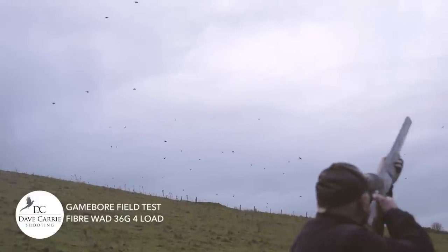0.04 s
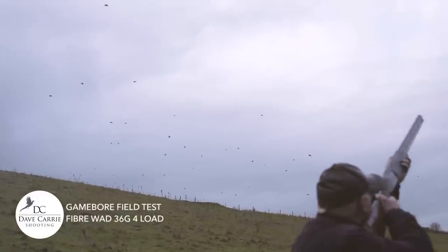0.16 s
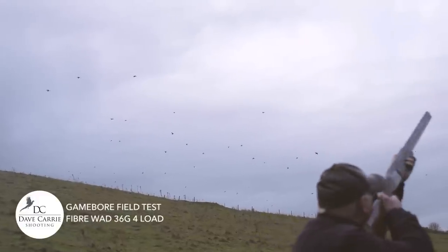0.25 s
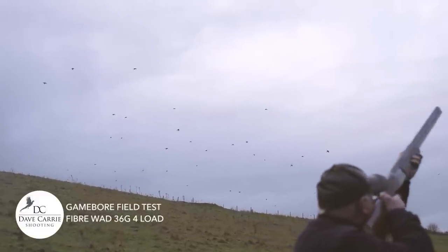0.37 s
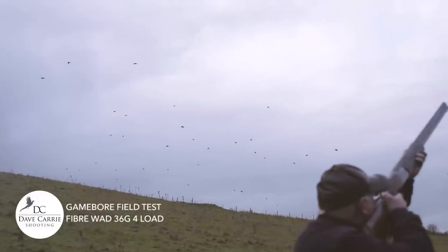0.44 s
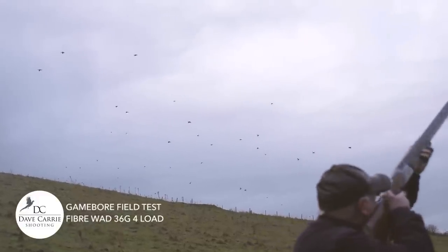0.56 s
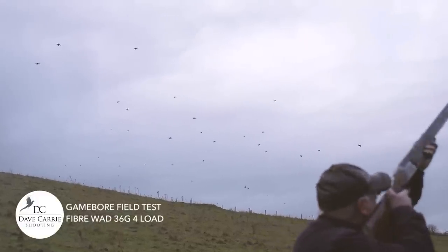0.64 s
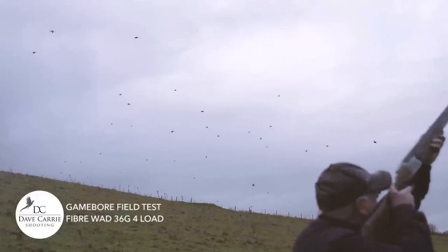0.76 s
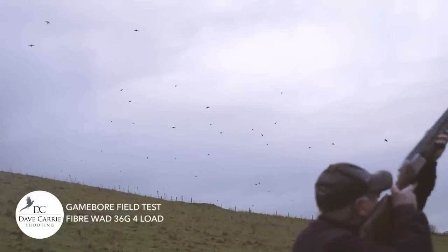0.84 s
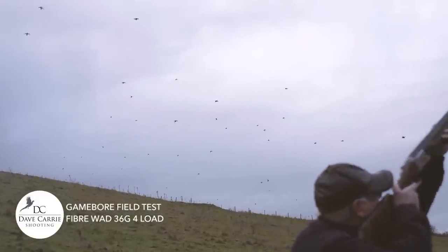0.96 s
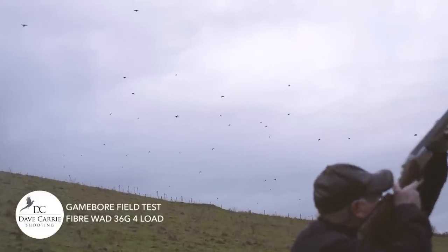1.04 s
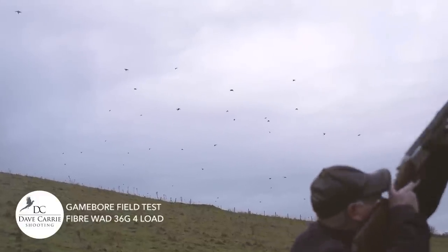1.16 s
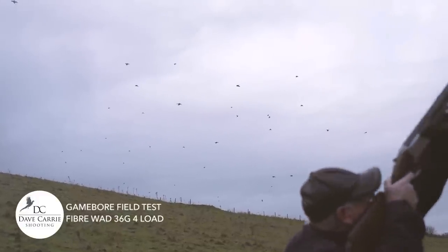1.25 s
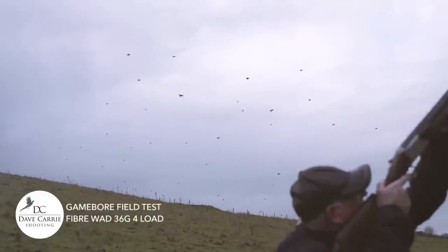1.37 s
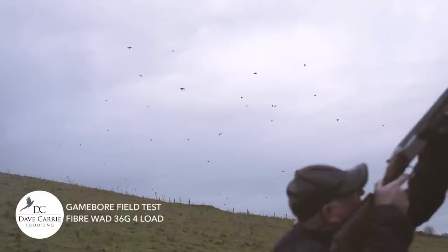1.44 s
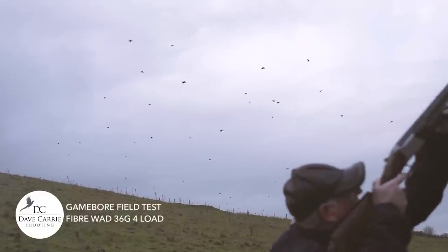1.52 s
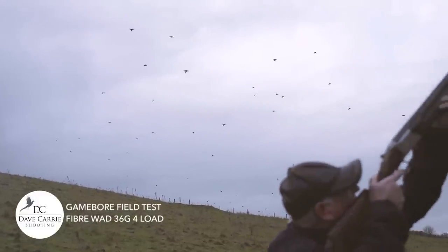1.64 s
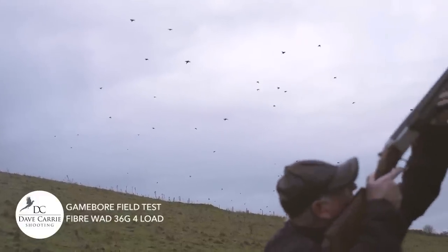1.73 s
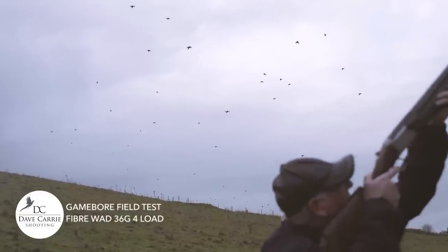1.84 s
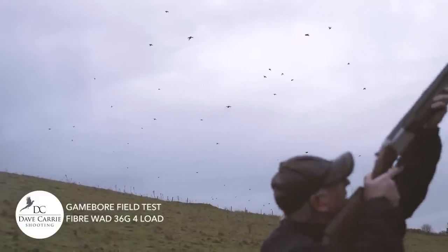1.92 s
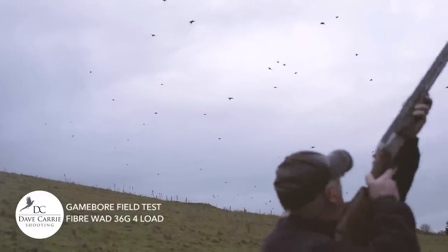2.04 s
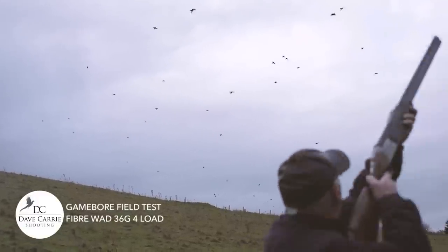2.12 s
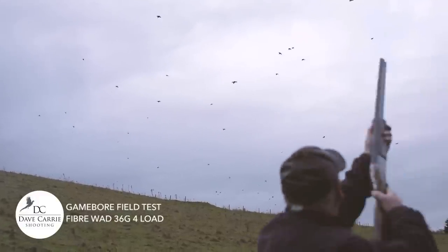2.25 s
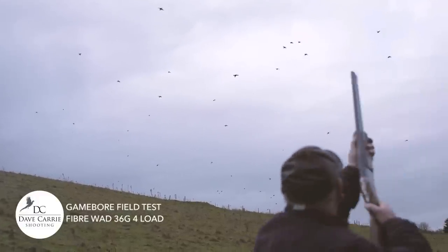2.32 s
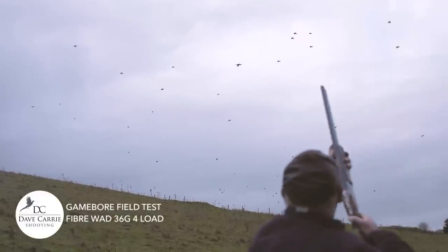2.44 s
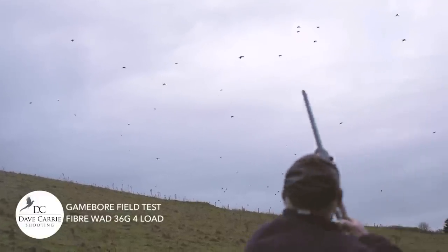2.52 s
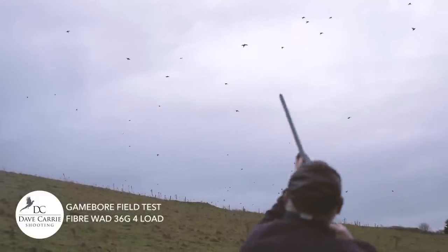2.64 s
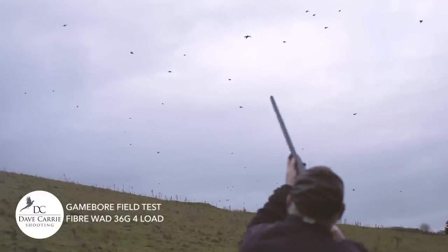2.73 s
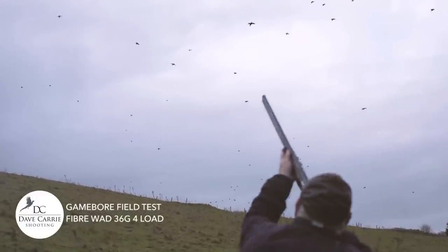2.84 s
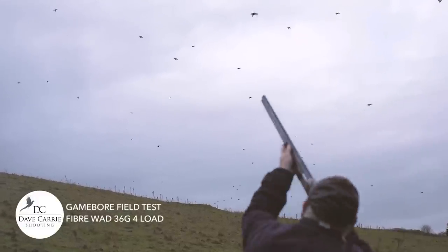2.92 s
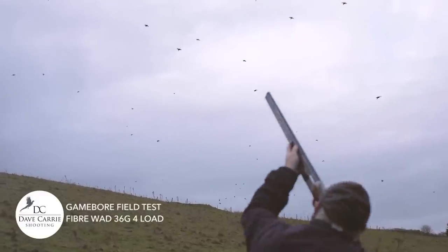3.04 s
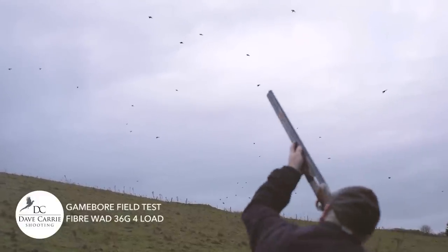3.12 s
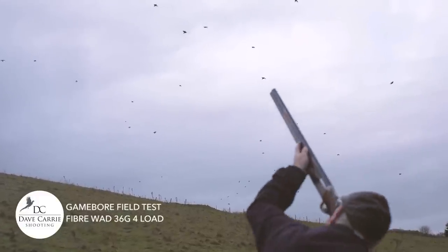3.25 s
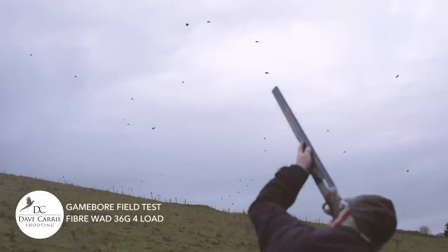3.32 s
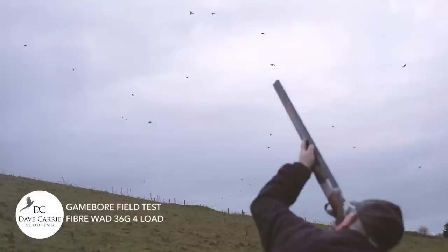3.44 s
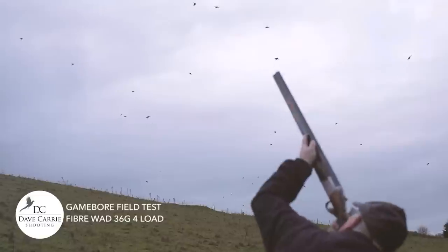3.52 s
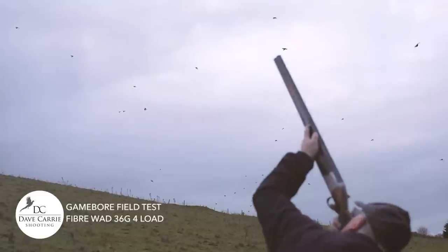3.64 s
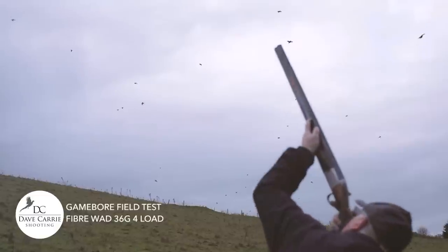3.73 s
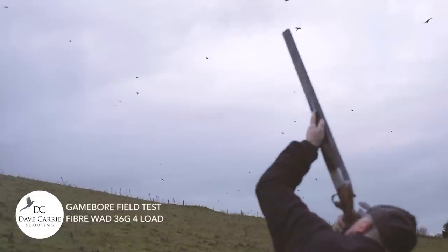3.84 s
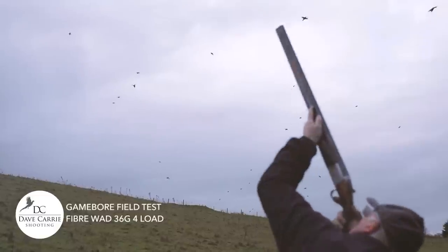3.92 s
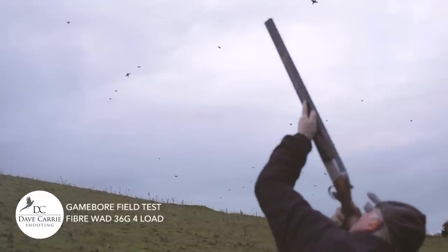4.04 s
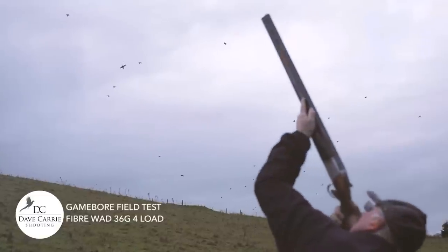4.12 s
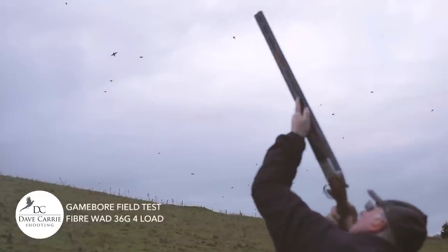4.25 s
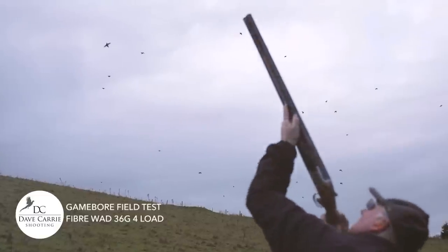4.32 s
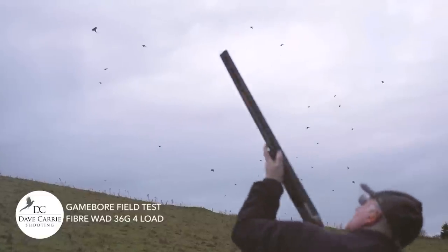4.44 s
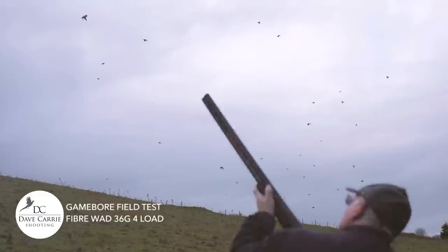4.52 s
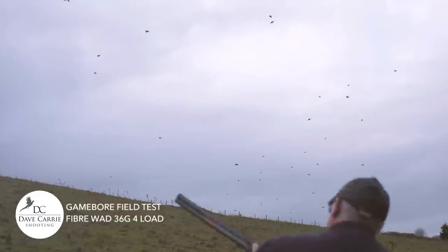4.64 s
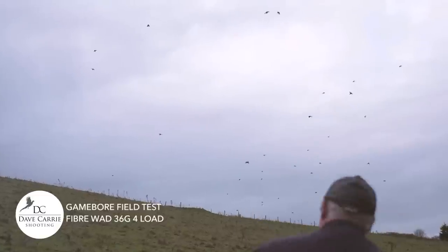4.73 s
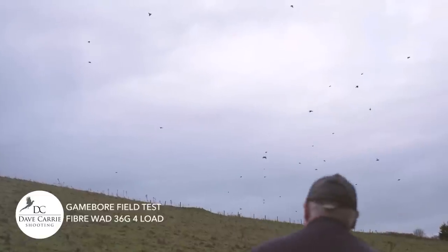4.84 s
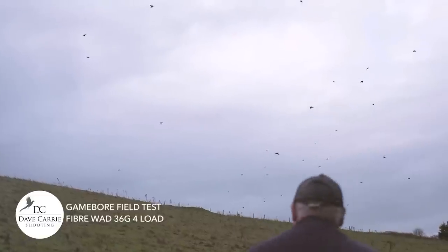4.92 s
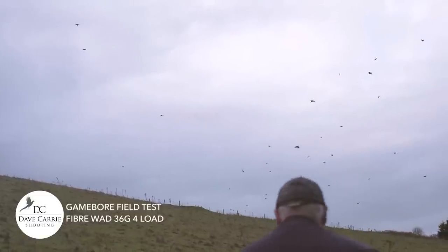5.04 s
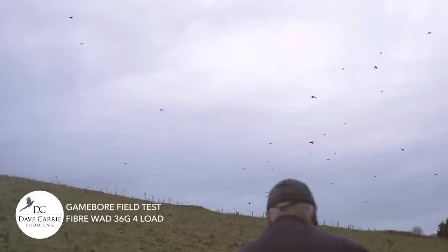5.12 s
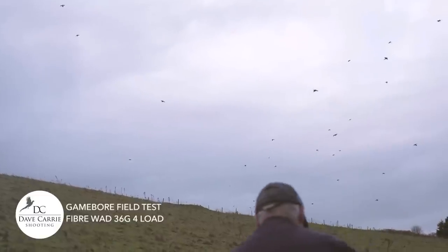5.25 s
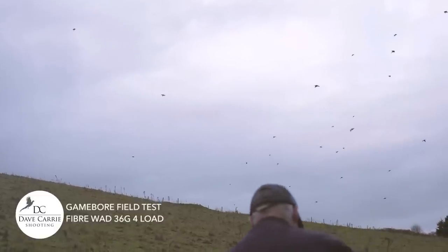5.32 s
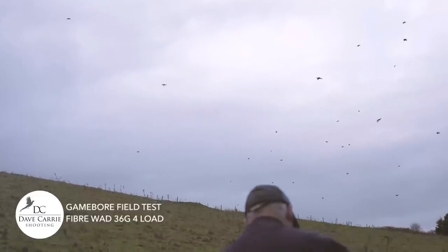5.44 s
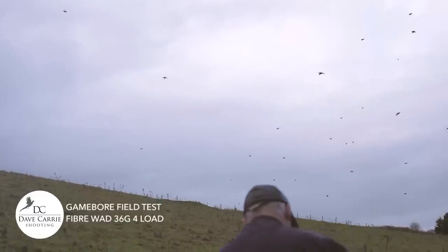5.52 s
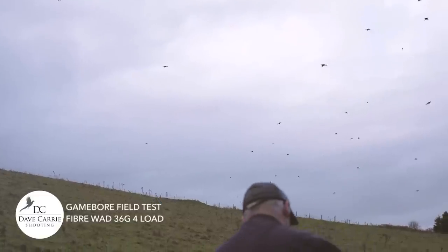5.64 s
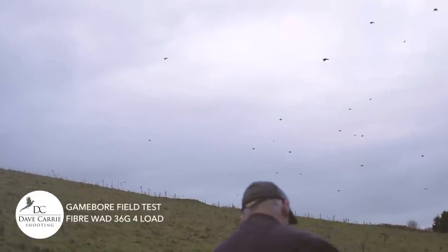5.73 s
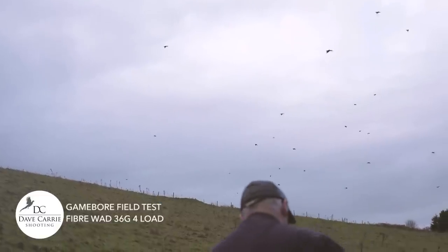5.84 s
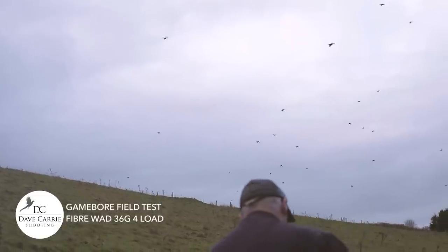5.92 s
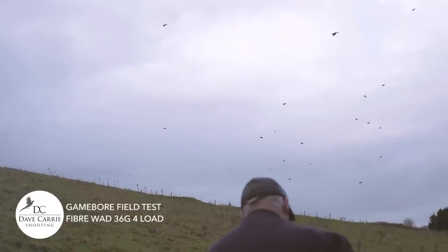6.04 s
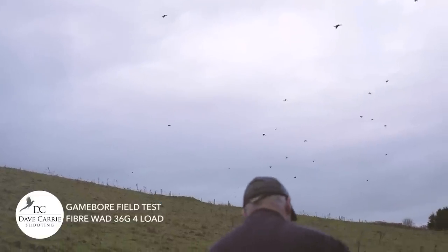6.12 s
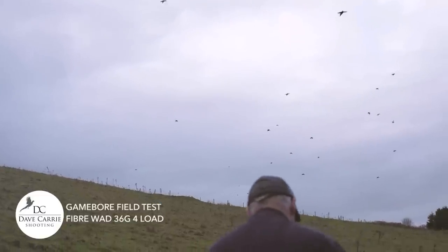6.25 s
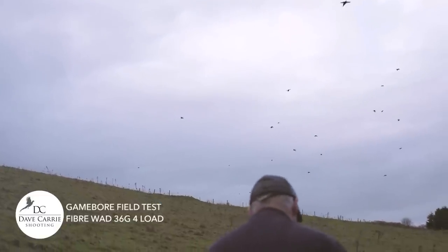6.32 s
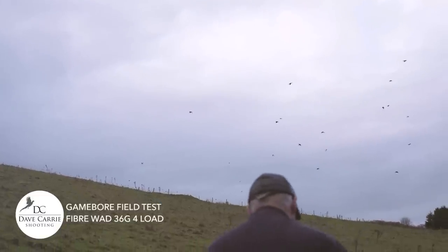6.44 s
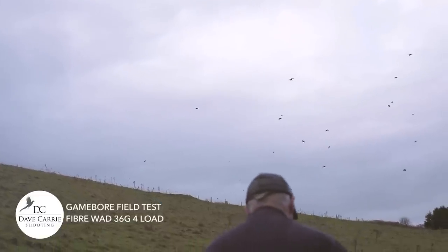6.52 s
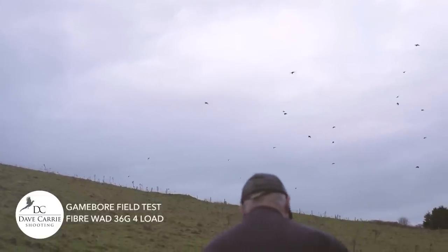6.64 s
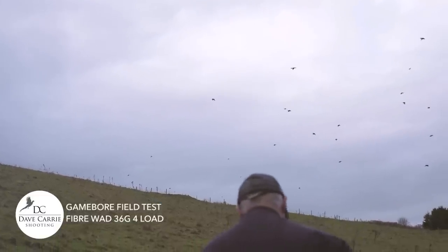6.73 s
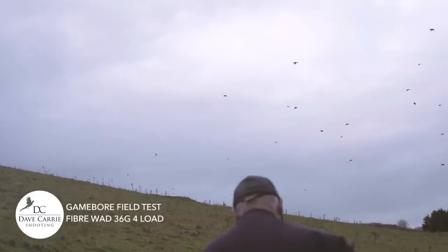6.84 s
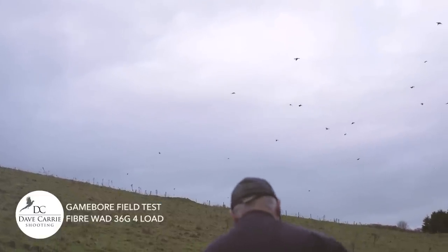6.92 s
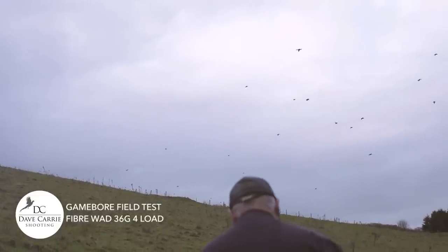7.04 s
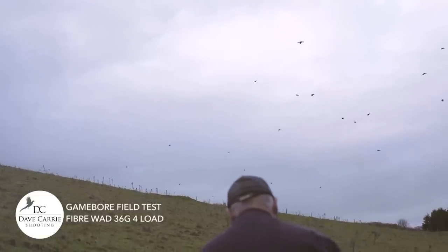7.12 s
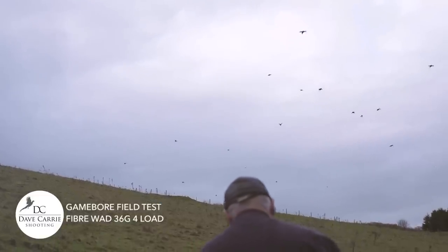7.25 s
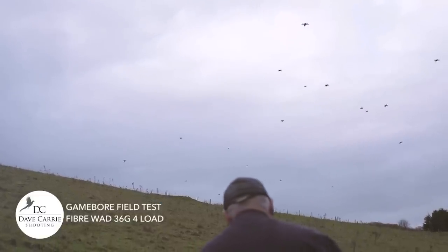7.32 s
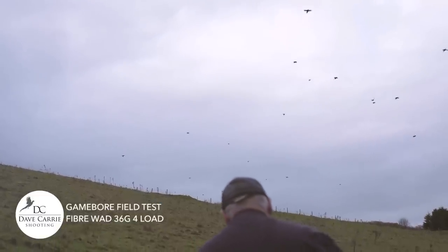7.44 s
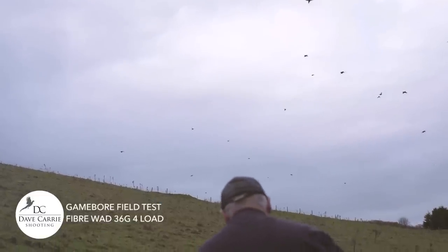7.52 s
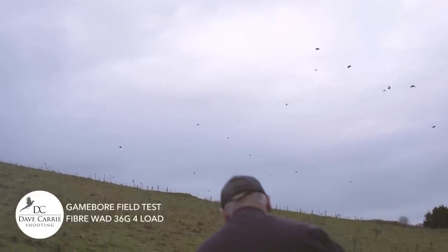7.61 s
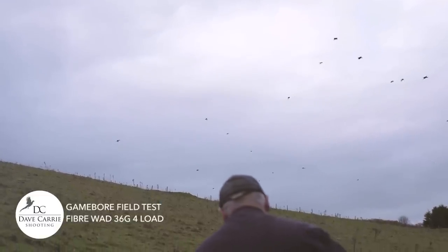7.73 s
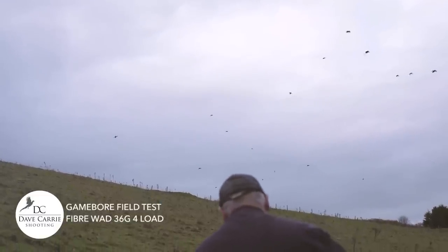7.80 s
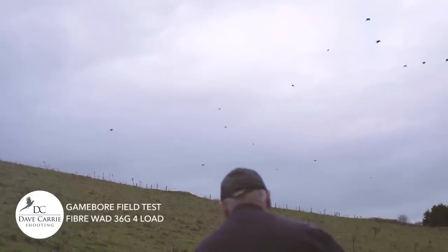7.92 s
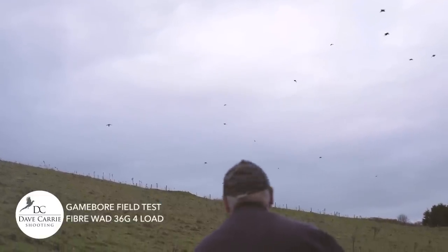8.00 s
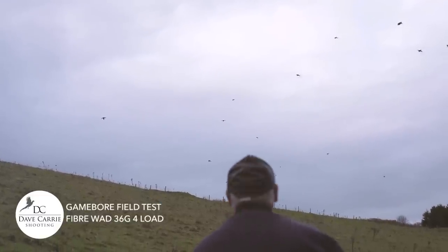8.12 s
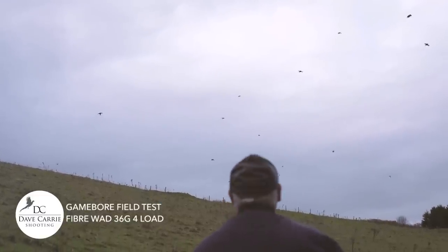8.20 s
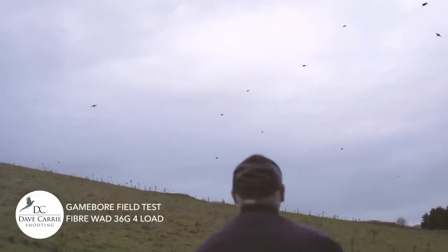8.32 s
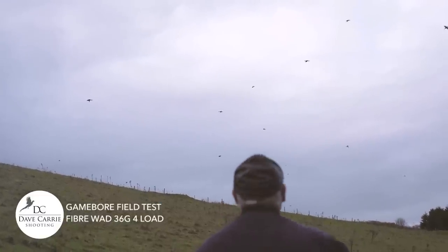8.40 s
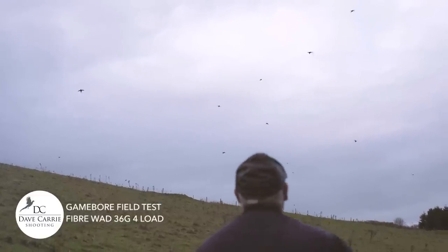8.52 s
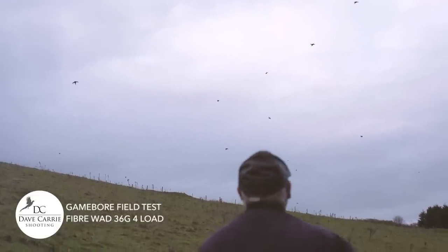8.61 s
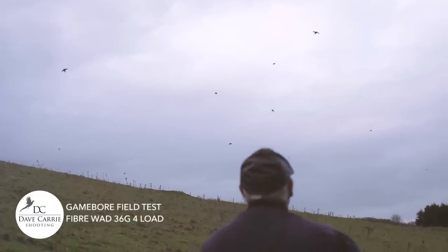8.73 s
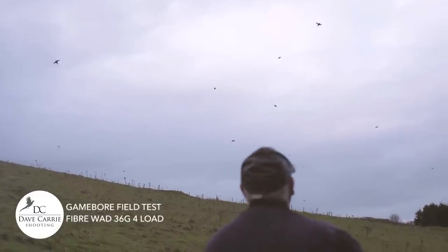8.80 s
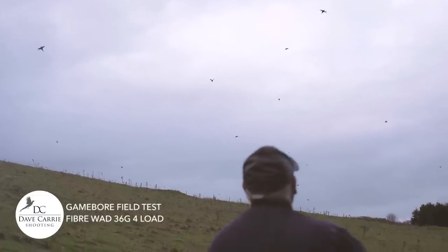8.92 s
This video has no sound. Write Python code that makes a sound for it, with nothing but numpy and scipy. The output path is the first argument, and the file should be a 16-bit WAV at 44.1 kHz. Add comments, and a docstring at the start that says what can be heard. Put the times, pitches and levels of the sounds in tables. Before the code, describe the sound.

Several shooters fire in open country, heard from just behind one of them. Two tight groups of blasts, each including a very close, sharp, overloaded shot, give way to isolated side and distant booms. Echoes roll down the valley. The gun is handled with small steel clacks, clothing rustles faintly, a tiny bird chirps briefly, and wind rumbles and thuds against the microphone, growing late.

```python
"""Shotguns fire at high birds from four stands along a grassy valley: blast impulses with ground bounces,
two slaps off the slope and a diffuse roll over the land; the closest blasts overload the input.
Softer rolls come from far down the valley. Struck steel clicks as the gun is handled, and many ticks
merge into a rustle. Gliding tones make a small bird, coloured noise a faint hush of open country,
and wind rumbles and buffets on the microphone."""
import sys
import numpy as np
from scipy import signal
from scipy.fft import rfft, irfft, next_fast_len
from scipy.io import wavfile
from scipy.ndimage import uniform_filter1d

SR = 44100
rng = np.random.default_rng(int(sys.argv[2]) if len(sys.argv) > 2 else 0)


def to_wav(sig):
    """Store sig (one row per channel, or 1-D mono) as 16-bit WAV at the path in sys.argv[1].

    Samples outside -1..1 are clipped; the rate is SR.
    """
    pcm = np.clip(np.atleast_2d(sig), -1, 1) * 32767
    pcm = np.round(pcm).astype(np.int16)
    wavfile.write(sys.argv[1], SR, pcm.T)  # frames by channels


N = 395577  # length of the scene [samples]
SHORT_FRAMES = dict(nperseg=256, noverlap=192)  # [samples]
LONG_FRAMES = dict(nperseg=1024, noverlap=768)  # [samples]


def amp(db):
    """Decibel law: level to amplitude ratio."""
    return 10 ** (np.asarray(db) / 20)


def evened(x):
    """Power normalisation: scale to rms 1."""
    return x / np.sqrt(np.mean(x ** 2) + 1e-20)


def unit(x):
    """Energy normalisation: scale to energy 1."""
    return x / (np.linalg.norm(x) + 1e-12)


def read(table, hz, axis=1):
    """Spectral interpolation: one column of a table along a log-frequency axis."""
    columns = np.transpose(table)
    return np.interp(np.log(hz + 1), np.log(columns[0] + 1), columns[axis])


def bins(size):
    """Fourier analysis: the frequencies of a real spectrum [Hz]."""
    return np.fft.rfftfreq(size, 1 / SR)


def octaves(hz):
    """Logarithmic pitch: octaves above 1 kHz, held constant below 200 Hz."""
    return np.log2(np.maximum(hz, 200) / 1000)


def add(mix, s, sound):
    """Superposition: add a sound to the mix, starting at s seconds."""
    part = mix[round(s * SR):][:len(sound)]
    part += sound[:len(part)]


def noise(table):
    """Spectral shaping: steady random noise of a given colour, rms 1."""
    size = next_fast_len(N)
    spectrum = rfft(rng.standard_normal(size)) * amp(read(table, bins(size)))
    return evened(irfft(spectrum, size)[:N])


def patchwork(shape, bands, frames):
    """Random modulation: patches smoothed over neighbouring bands and frames, rms 1."""
    across_bands = uniform_filter1d(rng.standard_normal(shape), size=bands, axis=0)
    return evened(uniform_filter1d(across_bands, size=frames, axis=1))


def burst(colour_db, decay, lead):
    """Impulse and scattering: a pressure step and its scatter off nearby surfaces, energy 1."""
    size = 2 * (len(colour_db) - 1)
    t = np.arange(size) / SR
    scatter = unit(rng.standard_normal(size) * np.exp(-(t / decay) ** 2))
    scatter[0] += lead
    z = rfft(scatter)
    # the scatter smears the impulse in time but leaves its broad colour alone
    ripple = np.sqrt(uniform_filter1d(abs(z) ** 2, size=21))
    log_gain = np.log(amp(colour_db) / ripple)
    # minimum phase: the colour is applied without sound ahead of the step
    mirrored = np.r_[log_gain, log_gain[-2:0:-1]]
    causal = np.exp(np.conj(signal.hilbert(mirrored)))
    return unit(irfft(z * causal[:len(z)])[:size // 2])


# colour of the open country: (frequency [Hz], relative level [dB])
HUSH = [(150, -20), (300, -7), (550, -3.5), (800, -13.5), (1000, -12), (1350, -10.5), (1900, -26),
        (3200, -20), (4000, -27.5), (5500, -42), (9000, -45), (15000, -53)]
HUSH_DB, HUSH_DRIFT_DB = -66.5, 2  # steady level; rms drift [dB]


def country(patchy_db=4.5):
    """Diffuse ambience: coloured noise whose faint hush drifts in patches."""
    z = signal.stft(noise(HUSH), SR, **LONG_FRAMES)[2]
    patches = patchwork(z.shape, bands=6, frames=14)
    drift = evened(uniform_filter1d(rng.standard_normal(z.shape[1]), size=40))
    z = z * amp(patchy_db * patches + HUSH_DRIFT_DB * drift)
    hush = signal.istft(z, SR, **LONG_FRAMES)[1][:N]
    return amp(HUSH_DB) * evened(hush)


GUST_ATTACK_S, GUST_RELEASE_S, GUST_SWELL_DB = 0.0096, 0.013, 5


def gust(start, length, db):
    """Transient envelope: a gust arrives quickly, swells to its middle and lets go."""
    t = np.arange(N) / SR - start
    swell_db = GUST_SWELL_DB * (np.sin(np.pi * np.clip(t / length, 0, 1)) - 1)
    attack = np.minimum(t, 0) / GUST_ATTACK_S
    release = np.maximum(t - length, 0) / GUST_RELEASE_S
    return amp(db + swell_db) * np.exp(attack - release)


# steady wind, easing in the middle and freshening towards the end: (time [s], relative level [dB])
BREEZE = [(0, -55.5), (.7, -55.5), (1.2, -53.5), (1.75, -60), (2.22, -50), (2.7, -53), (3.3, -51),
          (4.1, -57.5), (4.45, -64), (4.77, -55), (5.3, -61.5), (6.1, -52.5), (6.85, -44.5), (7.2, -49),
          (7.55, -39.5), (8.05, -44.5), (8.97, -39)]
# colour of the steady wind: (frequency [Hz], relative level [dB])
RUMBLE = [(15, 4.5), (35, 6), (70, 0.5), (120, -1.5), (180, -9.5), (280, -21), (500, -40), (1500, -69),
          (4000, -97.5)]
# gusts that strike the microphone: (start [s], length [s], relative peak level [dB])
GUSTS = [(1.992, 0.23, -36), (2.25, .21, -37), (2.577, .025, -44.5), (2.715, 0.081, -30),
         (2.809, 0.058, -40), (2.942, 0.043, -44), (3.085, 0.036, -34), (7.423, 0.26, -25),
         (7.719, 0.022, -36), (7.854, 0.072, -39), (8.447, .06, -35.5), (8.602, 0.043, -35),
         (8.662, 0.12, -26.5), (8.811, 0.056, -26)]
# colour of a gust at unit speed: (frequency [Hz], relative level [dB])
BUFFET = [(20, -14.5), (70, 3.5), (120, 6), (220, 2), (350, -5.5), (550, -12.5), (750, -29), (1100, -37.5),
          (1700, -61), (4000, -98.5)]


def wind(rumble_db=3, buffet_db=-0.5, reference_db=-33, opening=2.42):
    """Turbulence: a steady rumble, and gusts whose eddies get smaller and brighter as they grow."""
    t = np.arange(N) / SR
    rumble = amp(rumble_db + np.interp(t, *np.transpose(BREEZE))) * noise(RUMBLE)
    hz, frames, z = signal.stft(rng.standard_normal(N), SR, **LONG_FRAMES)
    strength = sum(gust(*row) for row in GUSTS)
    relative_strength = np.interp(frames, t, strength) / amp(reference_db)
    speed = (relative_strength + 0.038) ** (opening / 10)
    z = z * amp(read(BUFFET, hz[:, None] / speed))  # a higher speed shifts the colour upwards
    eddies = signal.istft(z, SR, **LONG_FRAMES)[1][:N]
    eddies /= np.sqrt(uniform_filter1d(eddies ** 2, size=3000))  # only the strength sets the level
    return rumble + amp(buffet_db) * strength * eddies


# a small bird far off: (time [s], level [dB], central pitch [Hz])
CHIRPS = [(3.02, -75.5, 4840), (3.08, -74.5, 3380), (3.16, -77, 3500), (3.21, -77, 3060),
          (3.24, -69.5, 3340), (3.265, -82.5, 3600), (3.322, -71.5, 3400)]


def bird(fall=0.036, waver=0.061):
    """Frequency modulation: thin, quick chirps fall in pitch and waver."""
    out, t = np.zeros(N), np.arange(0, .02, 1 / SR)
    for s, db, hz in CHIRPS:
        wobble = evened(uniform_filter1d(rng.standard_normal(SR // 4), size=40))[:len(t)]
        pitch = hz * (1 + fall * (.5 - t / t[-1]) + waver * wobble)
        tone = np.sin(2 * np.pi * np.cumsum(pitch) / SR)
        add(out, s, amp(db) * evened(np.hanning(len(t)) * tone))
    return out


# clothing and cartridges as the gun is swung or reloaded: (middle [s], length [s], peak level [dB])
RUSTLES = [(0.113, .16, -64), (2.031, 0.21, -74), (2.38, 0.084, -65), (4.85, 0.68, -70.5),
           (5.805, .45, -70), (6.575, .35, -66.5), (6.886, 0.14, -69.5), (7.45, 0.2, -70.5),
           (8.57, 0.25, -69.5)]
STILL_DB = -78  # the faint rustle of standing still [dB]


def movement():
    """Power addition: smooth swells of movement join the rustle of standing still."""
    t = np.arange(N) / SR
    moves = sum(amp(db) * np.cos(np.pi * np.clip((t - s) / length, -.5, .5))
                for s, length, db in RUSTLES)
    return np.hypot(amp(STILL_DB), moves)


# colour of the gun's knocks, also of the rustle: (frequency [Hz], relative level [dB])
ACTION = [(20, -40), (200, -13.5), (600, -1.5), (930, -10), (1500, -2.5), (2200, -3.5), (3300, -13),
          (4500, -13.5), (8000, -21.5), (15000, -32)]


def rustle():
    """Shot noise: many tiny ticks of uneven size merge into a soft rustle."""
    size = amp(3.5 * np.minimum(rng.exponential(1, N), 3))
    present = rng.random(N) < 500 / SR  # 500 ticks a second on average
    ticks = size * present * rng.choice([-1, 1], N)
    hz = bins(size=2048)
    softening_db = -10 * np.log10(1 + (hz / 4500) ** 4)
    tick = burst(read(ACTION, hz) + softening_db, decay=.007, lead=.1)
    return movement() * evened(signal.oaconvolve(ticks, tick)[:N])


# colour of what comes back: (frequency [Hz], slap off the slope [dB], roll over the land [dB])
RETURN = [(20, -17, -19.5), (60, -4, -7), (130, -4.5, -6.5), (268, 2.5, 2), (550, -1, -1.5),
          (875.6, -2, -5.5), (1398.5, -4, -3.5), (1840, -7, -12.5), (3260, -10, -14), (4950, -19, -21.5),
          (8000, -25.5, -28), (15000, -45, -45)]
# how long the land rings before the linger factor: (frequency [Hz], time to fall 60 dB [s])
ROLL_T60 = [(60, .8), (250, 1.3), (600, 0.93), (1400, 0.91), (3000, .95), (5000, .7), (9000, .48),
            (15000, 0.47)]


def roll(tilt, linger=1, rise=0.0091, early=0.82, early_s=0.022, patchy_db=1.5, flutter_db=1.97):
    """Reverberation: countless echoes off grass, hedges and trees; the air takes the treble first."""
    echoes = rng.standard_normal(SR * 3 // 2)
    # single trunks and posts stand out
    echoes += 9 * np.sign(echoes) * (rng.random(len(echoes)) < 55 / SR)
    hz, t, z = signal.stft(echoes, SR, **SHORT_FRAMES)
    patches = patchwork(z.shape, bands=5, frames=8)
    flutter = evened(uniform_filter1d(rng.standard_normal(len(t)), size=3))
    colour = read(RETURN, hz, axis=2) + tilt * octaves(hz)
    fade = -60 * t / (linger * read(ROLL_T60, hz)[:, None])
    z = z * amp(colour[:, None] + fade + patchy_db * patches + flutter_db * flutter)
    tail = signal.istft(z, SR, **SHORT_FRAMES)[1]
    t = np.arange(len(tail)) / SR
    onset = 1 - np.exp(-t / rise)
    return unit(tail * onset * (1 + early * np.exp(-t / early_s)))


# brief modes of the steel: (frequency [Hz], relative level [dB], time to fall 60 dB [s])
STEEL = [(1360, -8.5, 0.044), (2270, -5, 0.011), (3173, 1.5, 0.008), (3600, -15.5, 0.054),
         (4290, -15, 0.074), (5766, -21, 0.058), (7171, -23, 0.068)]


def steel_ring(tilt, t):
    """Modal vibration: a sum of decaying sines at the modes of the steel, energy 1."""
    ring = np.zeros(len(t))
    for f, level, t60 in STEEL:
        envelope = amp(level + tilt * octaves(f) - 60 * t / t60)
        ring += envelope * np.sin(2 * np.pi * (f * t + rng.random()))
    return unit(ring)


# lock, breech and small knocks of the gun being handled:
# (time [s], knock energy [dB], brightness [dB per octave], decay of the scatter [s])
CLACKS = [(.394, -46, 1, 0.0018), (1.2502, 4, 4, 0.0099), (1.339, -15.5, 1.5, 0.0017),
          (2.9482, -26, -5, 0.0053), (3.8934, -11, 4.5, 0.0077), (4.114, -24.5, 2, 0.011),
          (4.61, -39.5, -1, 0.0022), (4.715, -42.5, -0.5, .004), (4.822, -35, 0.5, 0.0096),
          (4.88, -12, 0.5, 0.0083), (5.025, -32, -5.5, 0.0053), (5.5493, -31.5, -3.5, 0.0065),
          (6.3091, -23.5, 1, 0.0022), (6.5246, -30.5, -2, .003), (6.85, -38.5, -5, 0.0064),
          (6.934, -24, -0.1, 0.0062), (8.6518, -36.5, 0.5, 0.0042)]


def action(wet_db=-15, ring_db=-7):
    """Impact excitation: steel parts of the gun snap home and ring, with a trace of echo."""
    out, hz = np.zeros(N), bins(size=4096)
    t = np.arange(len(hz)) / SR
    for s, db, tilt, decay in CLACKS:
        colour = read(ACTION, hz) + tilt * octaves(hz)
        add(out, s, amp(db) * burst(colour, decay, lead=0.15))
        add(out, s, amp(db + ring_db) * steel_ring(tilt, t))
        add(out, s, amp(db + wet_db) * roll(1.7, rise=.003, early=9, early_s=.018))
    return out


def doubled(x, delay, share):
    """Comb filtering: a sound plus its delayed bounce, at about the same energy."""
    t = np.arange(len(x)) / SR
    bounce = np.interp(t - delay, t, x, left=0)
    return (x + share * bounce) / np.hypot(1, share)


# soft reports and late echoes from far down the valley:
# (time [s], energy [dB], brightness [dB per octave])
DISTANT = [(.118, -21.5, -2.4), (2.34, -23, -4.5), (4.25, -9.5, -1.6), (6.088, -19.5, -2.5),
           (6.235, -14.5, -0.5), (7.06, -16, -5.5), (7.174, -9.5, -2), (7.33, -19.5, -4.5), (8.17, -15, -5)]
# the ground bounce that stripes each report and all its echoes, by stand: (delay [s], share [ratio])
STANDS = {"far": (.00155, 0.31), "neighbour": (.0019, 0.67), "side": (0.00158, 0.42), "own": (.0014, 0.23)}


def distant_guns():
    """Diffuse propagation: from far away only the soft roll arrives."""
    out = np.zeros(N)
    for s, db, tilt in DISTANT:
        add(out, s, amp(db) * roll(tilt, rise=0.019, early=10, early_s=0.023))
    return doubled(out, *STANDS["far"])


# muzzle blast as it arrives from each stand, relative levels:
# (frequency [Hz], far [dB], neighbour [dB], side [dB], own [dB])
BLAST = [(20, -35, -32, -35.5, -38), (55, -21, -9, -15.5, -19), (142, 5, -2.5, -5, -3.5),
         (290, -1.5, 4.5, -7.5, -0.5), (614, -2.5, 2, 5, -4.5), (895, -14, -5, -3, -4),
         (1320, -9.5, -4.5, -2.5, 1), (1940, -26.5, -14.5, -3, -10.5), (2892, -19, -11, -4.5, -1.5),
         (4650, -32.5, -28, -12, -7.5), (7860, -35.5, -25.5, -20, -14.5), (11000, -61, -35.5, -29, -16.5),
         (15000, -63, -43, -45, -21.5)]
# how long each stand's echoes last, by stand: factor on the ring of the land [ratio]
LINGER = {"far": 1.2, "neighbour": 1.02, "side": 1.03, "own": 0.96}


def report(stand, blast_db, tilt, first_db, second_db, slap_tilt, roll_db, roll_tilt,
           first_slap_s=.0102, second_slap_s=0.0268, thump_hz=95, thump_db=-8):
    """Direct and reflected sound: a blast, two slaps off the slope and the roll; far off, a thump."""
    out, hz = np.zeros(2 * SR), bins(size=4096)
    column = 1 + list(STANDS).index(stand)
    colour = read(BLAST, hz, axis=column) + tilt * octaves(hz)
    slap = read(RETURN, hz) + slap_tilt * octaves(hz)
    if stand == "own":  # so close that the blast and its ground scatter run together
        # the shooter's own blast is lean in bass
        lean_db = -10 * np.log10(1 + (130 / (hz + 20)) ** 2)
        add(out, 0, amp(blast_db) * burst(colour + lean_db, decay=.0055, lead=0.23))
        add(out, .008, amp(first_db) * burst(slap, decay=.015, lead=0.083))
    else:
        add(out, 0, amp(blast_db) * burst(colour, decay=0.0034, lead=0.08))
        add(out, first_slap_s, amp(first_db) * burst(slap, decay=0.0049, lead=0.39))
    if stand == "far":  # over distance the boom outlasts the crack
        t = np.arange(len(hz)) / SR
        thump = unit(np.sin(2 * np.pi * thump_hz * t) * t * np.exp(-t / .004))
        add(out, .001, amp(blast_db + thump_db) * thump)
    add(out, second_slap_s, amp(second_db) * burst(slap, decay=0.015, lead=0.61))
    add(out, 0, amp(roll_db) * roll(roll_tilt, LINGER[stand]))
    # one more short bounce, its delay drawn at random, colours every shot differently
    out = doubled(out, rng.uniform(.0007, .0013), .25)
    return doubled(out, *STANDS[stand])


# the shots: (time [s], stand, blast energy [dB], blast brightness [dB per octave],
# first slap [dB], second slap [dB], slap brightness [dB per octave],
# roll [dB], roll brightness [dB per octave])
SHOTS = [ (1.0112, "far", 0, 3, -3, -8.5, .3, -2, -2.2),
         (1.2280, "neighbour", 10.5, -1.4, 9, 14.5, -0.85, -1, -1.5),
         (1.2540, "own", 22.5, -1, 10.5, 2, 0.03, 7.5, 1.33),
         (3.3650, "neighbour", 15.5, -0.5, 10.5, -2, 0, 0, 0.5),
         (3.898, "own", 20.5, -0.96, 11, -0.5, 0.5, 6, 1.07),
         (4.1729, "neighbour", 10, 0.15, 5.5, -3, -0.3, 0.5, -0.1),
         (5.1837, "side", 13, 0, -20.5, -24.5, 1.96, -2, 1.5),
         (6.1525, "side", 10, -0.36, -28, -36.5, 7, -4, 2), (7.1072, "far", 6.5, 0.3, 0, -5, 0, -3, -1.06),
         (8.0167, "far", 7.5, -0.7, -0.5, -3, -0.8, -5, -2)]


def guns():
    """Superposition of impulsive sources: all the stands firing."""
    out = np.zeros(N)
    for s, *shot in SHOTS:
        add(out, s, report(*shot))
    return out


# brief dips in the level of everything but the wind: (time [s], depth [dB], half width [s])
DIPS = [(6.013, 8.999, 0.038), (7.311, 9, 0.03)]


def scene():
    """Linear superposition: every source sums at the one microphone."""
    t = np.arange(N) / SR
    dips = amp(-sum(db * np.exp(-((t - s) / width) ** 2) for s, db, width in DIPS))
    sources = guns() + distant_guns() + action() + rustle() + bird() + country()
    return (dips * sources + wind())[None]


def record(dry):
    """Saturation and band limiting: the closest blasts flatten, then bass and extreme treble are cut."""
    clipped = dry / (1 + (dry / .7) ** 8) ** (1 / 8)
    bass_cut = signal.butter(3, 44, "highpass", fs=SR, output="sos")
    coupled = signal.sosfilt(bass_cut, clipped)
    band_limit = signal.firwin(255, 16200, window=("kaiser", 9), fs=SR)  # lowpass edge [Hz]
    return signal.oaconvolve(coupled, band_limit[None], "same")


dry = scene()
out = record(dry)
to_wav(out)
```